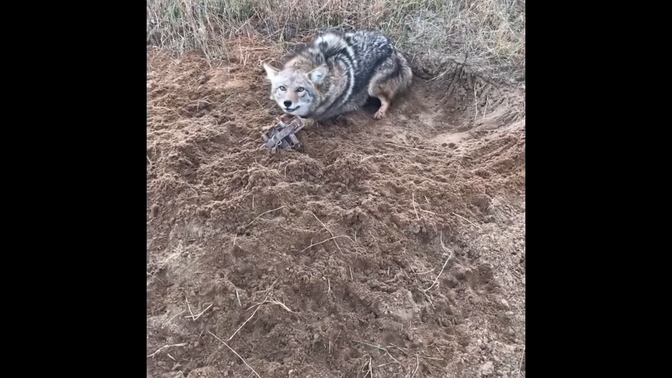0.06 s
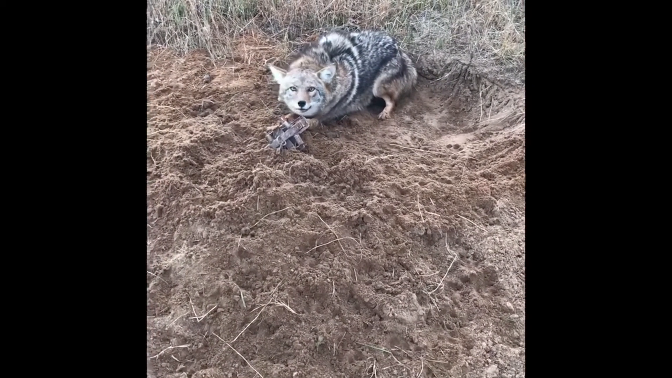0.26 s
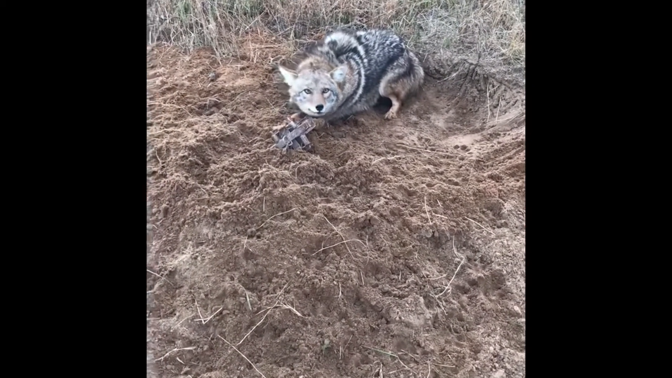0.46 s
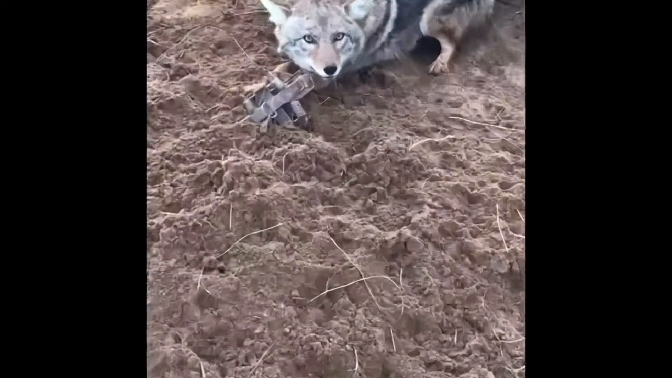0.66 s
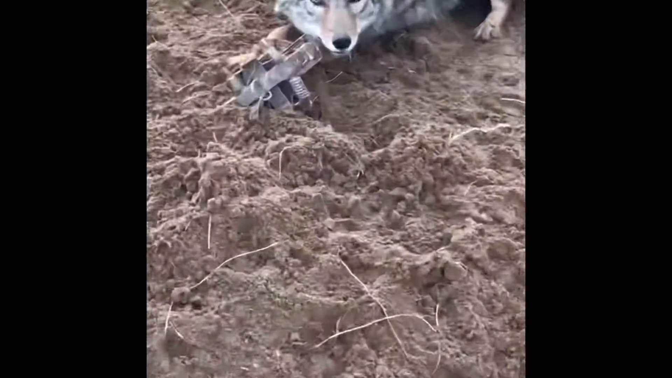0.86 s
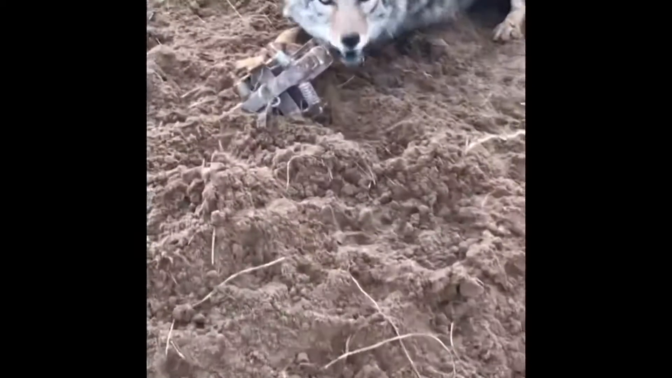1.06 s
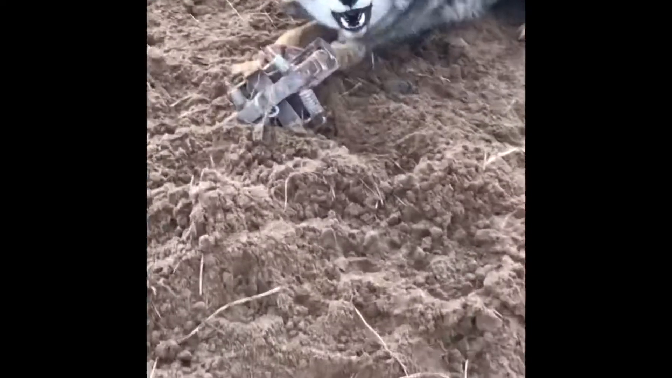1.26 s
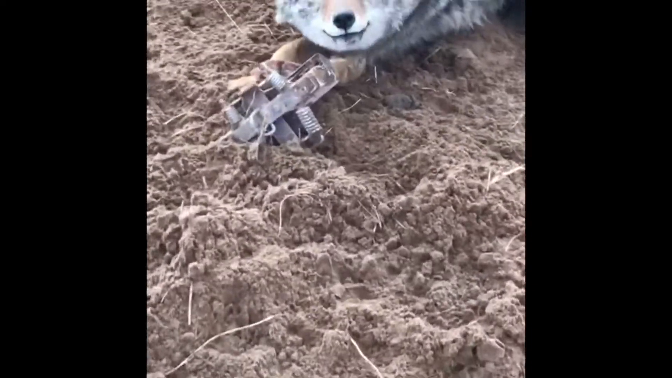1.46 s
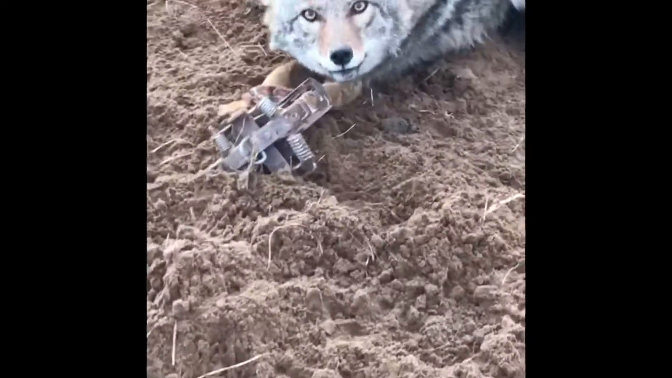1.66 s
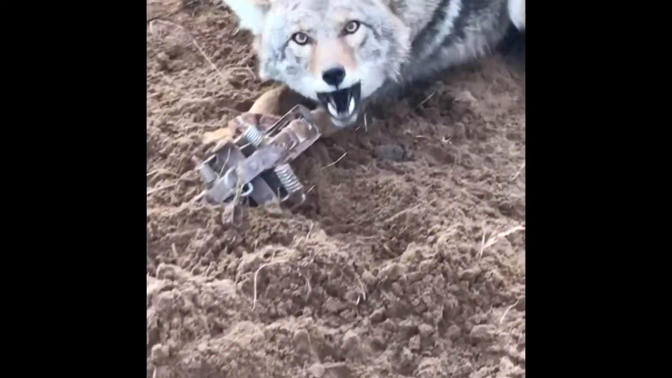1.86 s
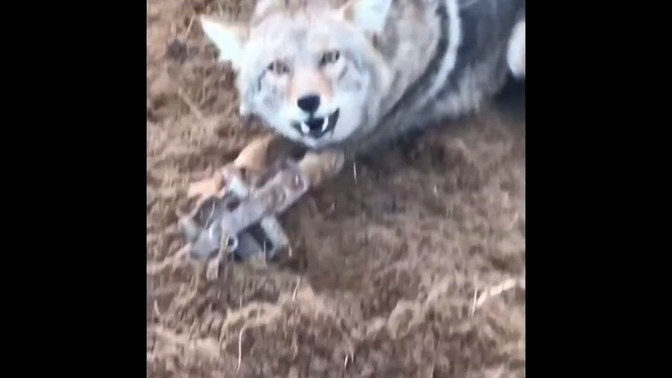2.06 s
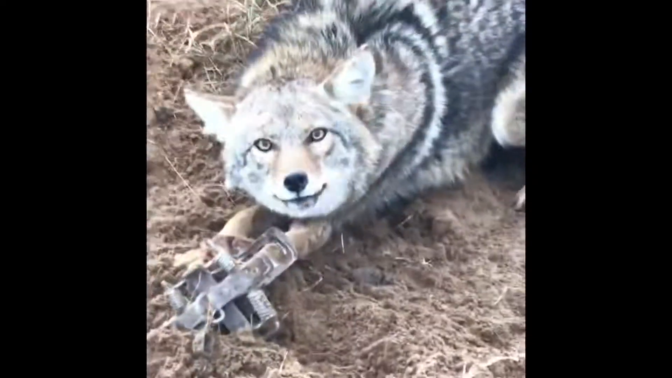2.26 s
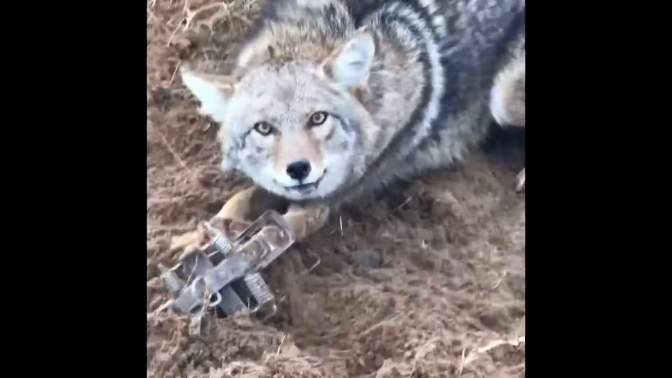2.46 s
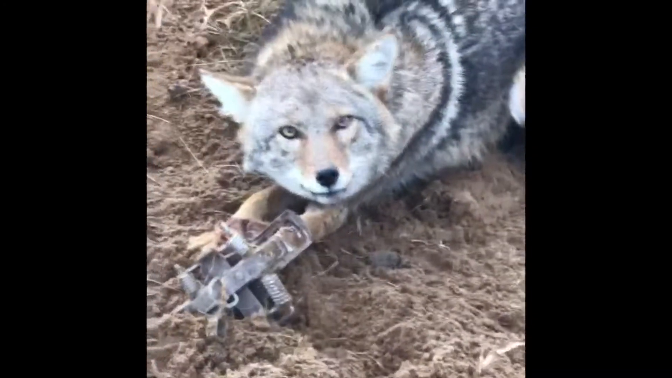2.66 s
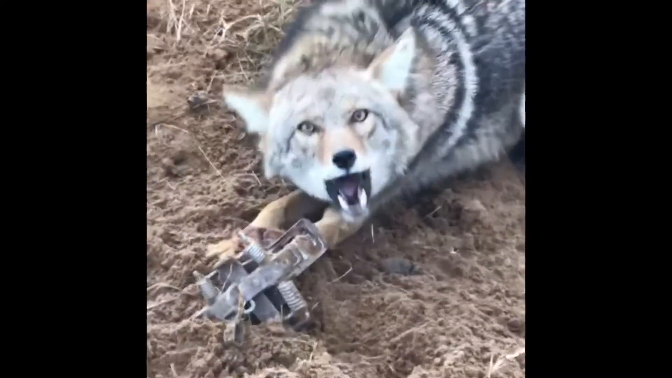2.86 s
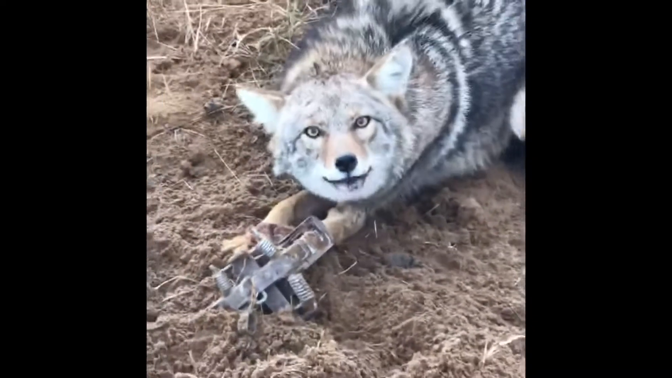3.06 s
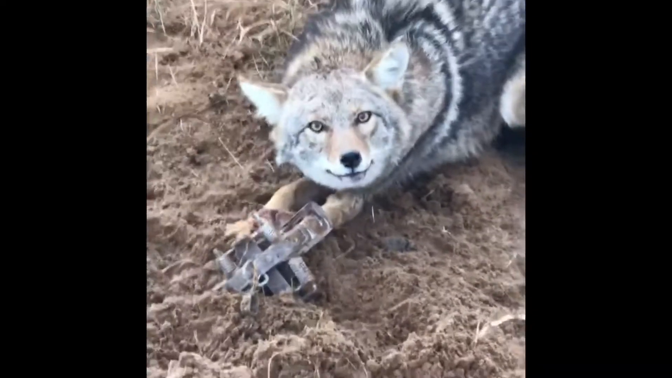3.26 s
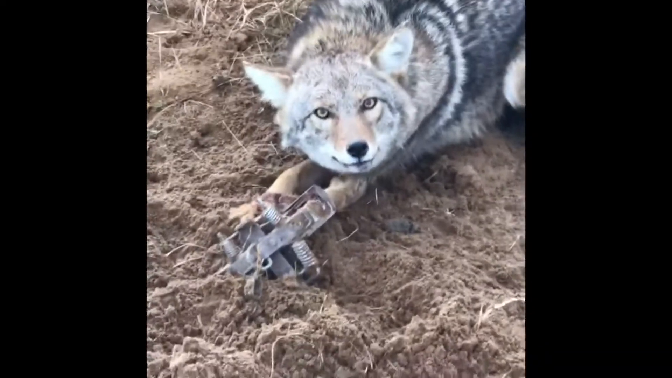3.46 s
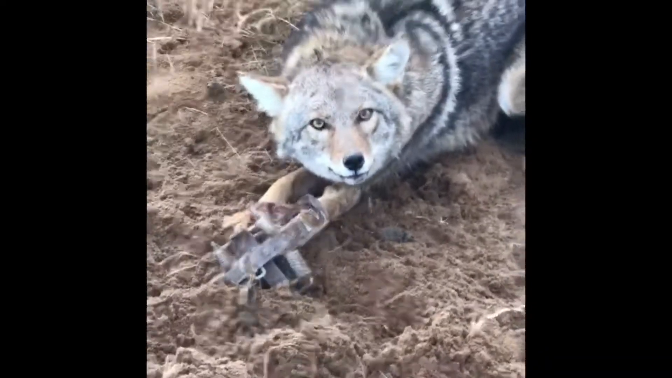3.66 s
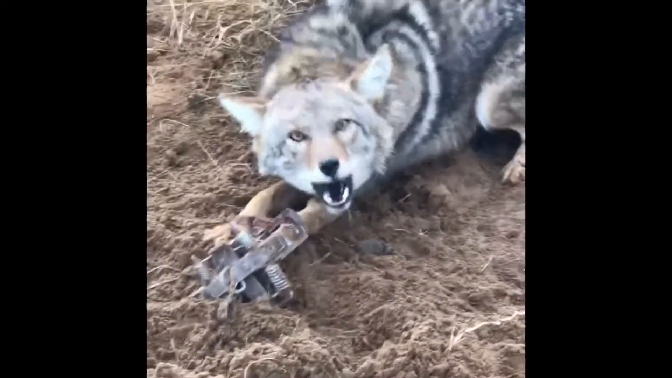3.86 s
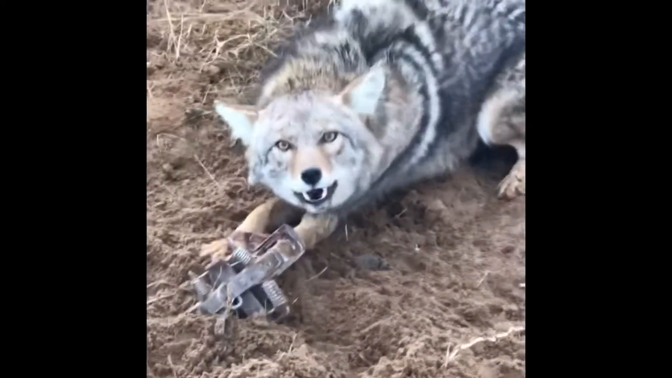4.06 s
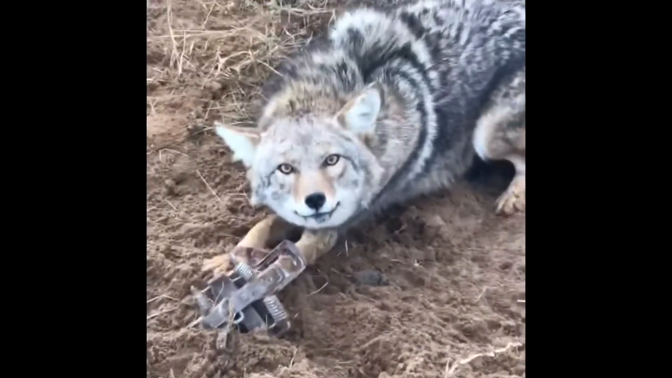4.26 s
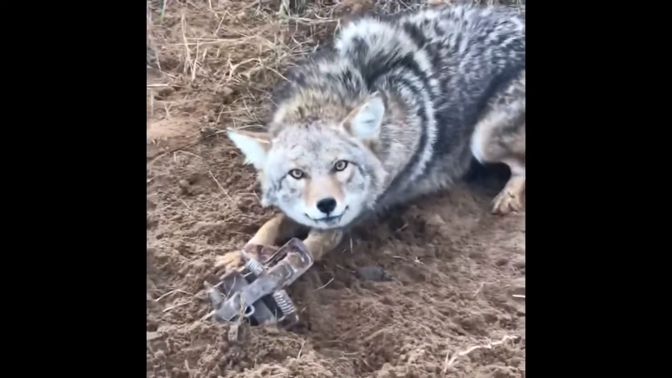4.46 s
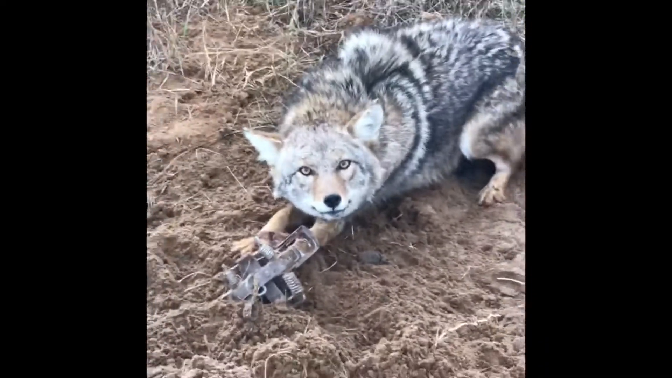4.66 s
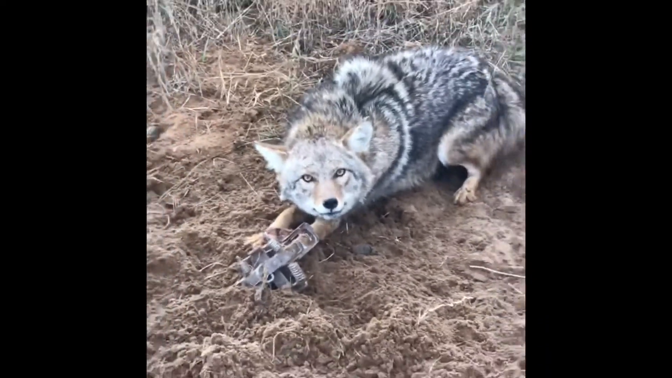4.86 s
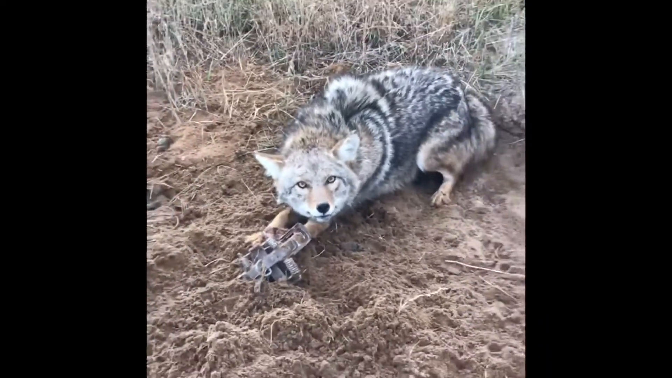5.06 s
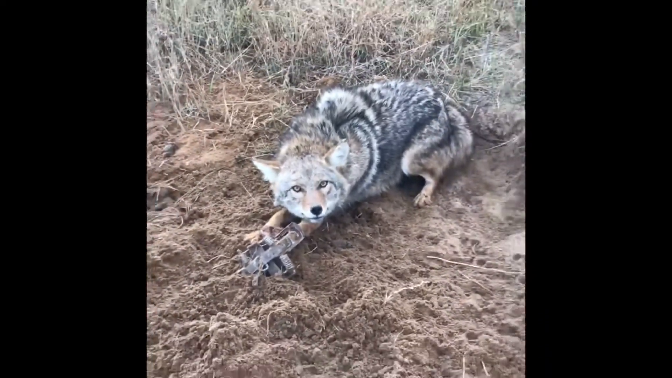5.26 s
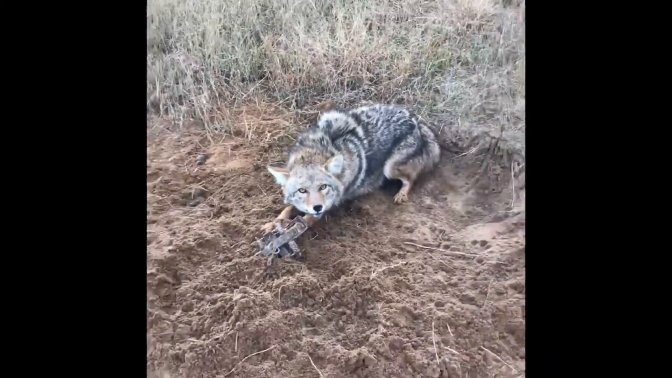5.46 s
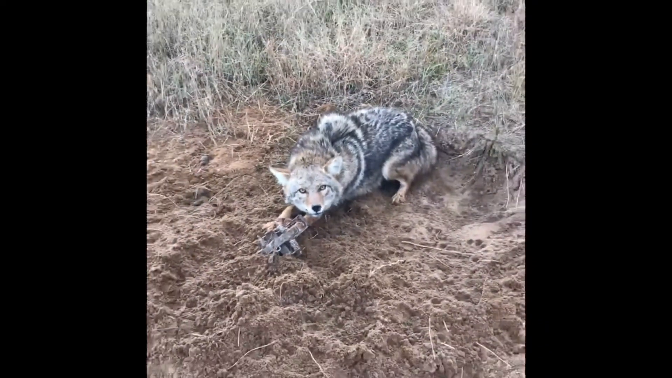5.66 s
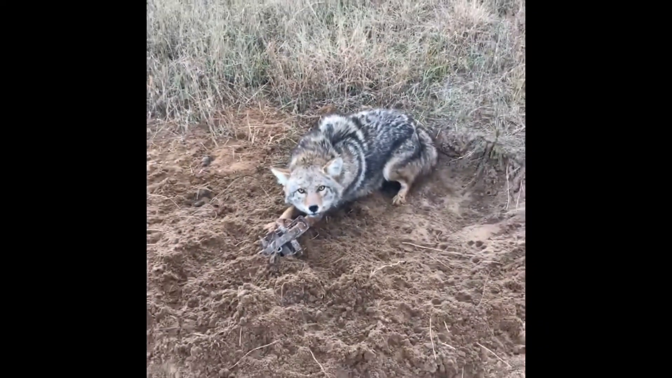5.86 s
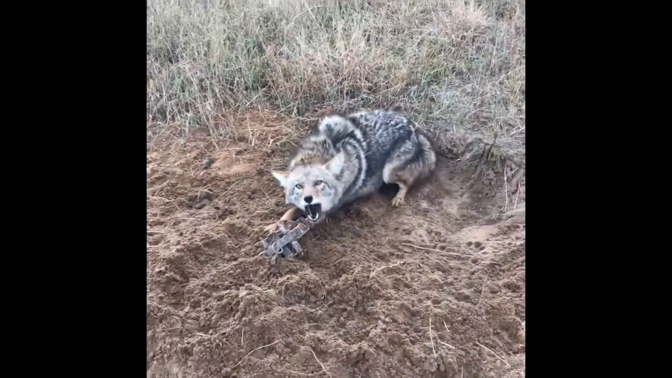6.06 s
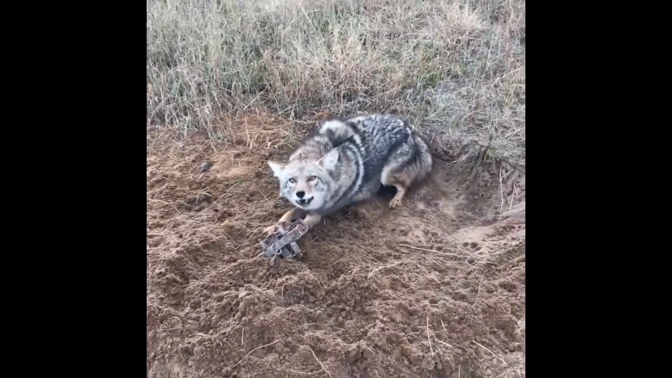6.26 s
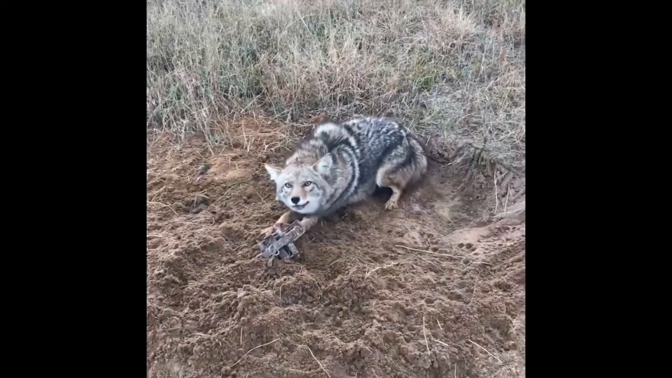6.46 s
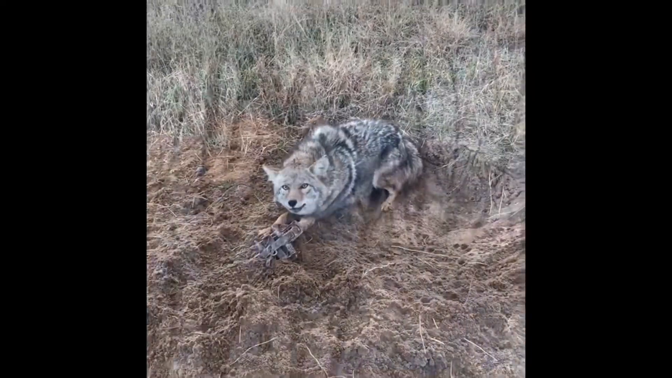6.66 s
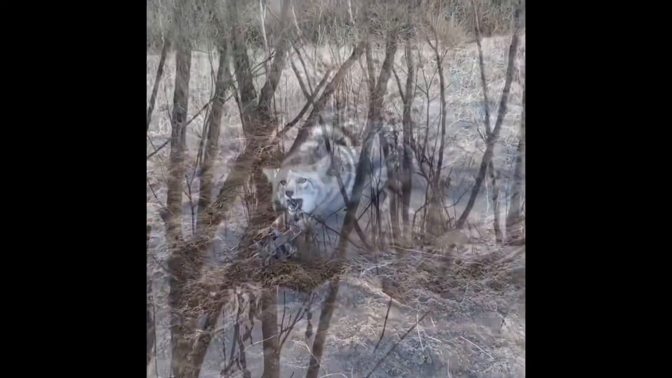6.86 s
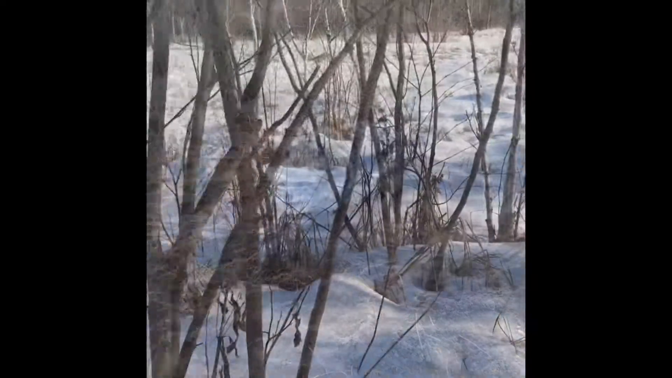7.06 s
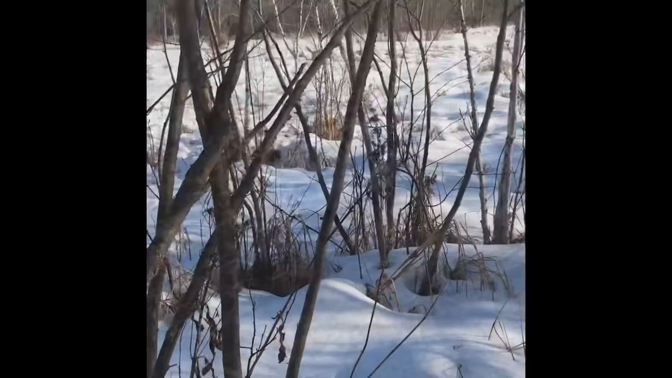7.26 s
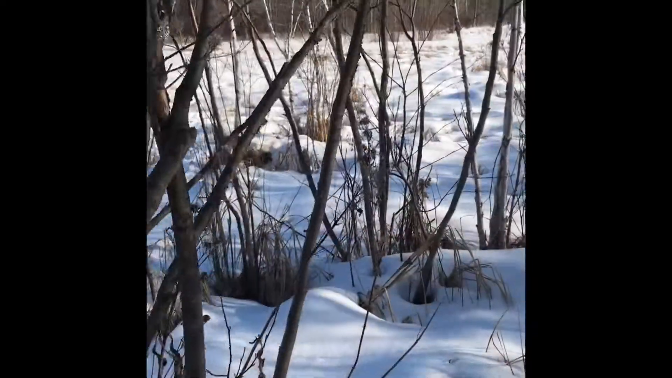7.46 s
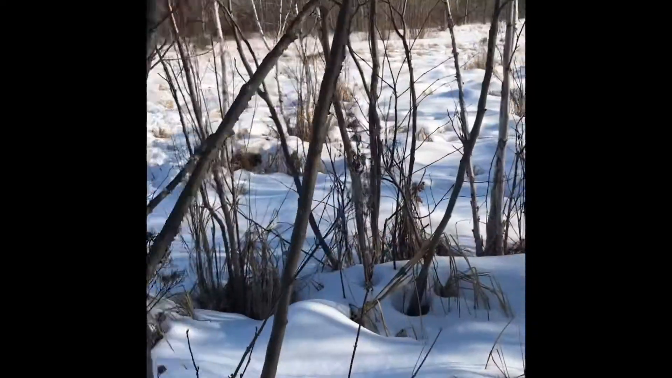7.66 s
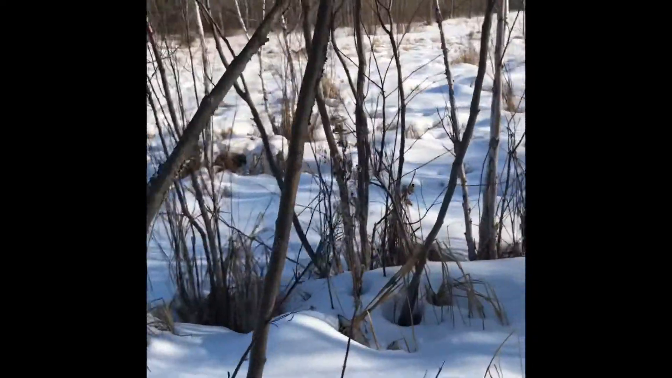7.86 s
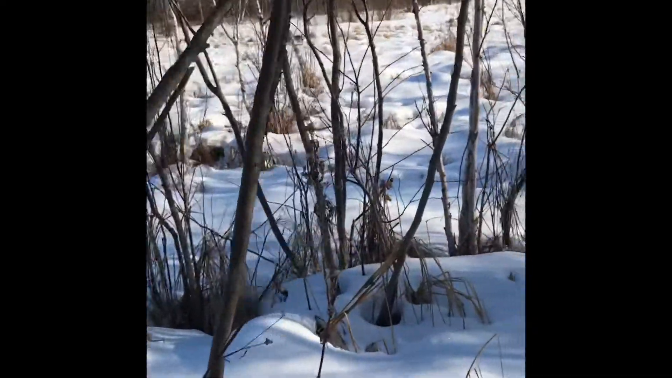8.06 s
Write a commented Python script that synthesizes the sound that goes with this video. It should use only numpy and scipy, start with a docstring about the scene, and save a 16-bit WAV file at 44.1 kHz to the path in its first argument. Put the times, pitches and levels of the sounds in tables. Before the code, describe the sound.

A faint steady hiss of a far road, strongest in the middle range, opens outdoors with soft dry grass rustle and a few tiny ticks. At about 1.05 seconds a nearby coyote gives a sharp, hoarse bark, roughly an eighth of a second long, its pitch arching quickly up and down with a rough, raspy edge. Low wind bumps hit the microphone around 1.25 to 1.5. Similar barks follow near 1.8, 2.7 and 3.8, then, after a longer gap, at 6.0 and 6.7. Very quiet, slow-pulsing growls swell in the gaps; slight ticks trail some barks and grass rustles again near 4.8 and 5.8. From 6.5 the background drops quickly, then keeps fading. Boots begin crunching crusty snow softly near 6.9, with a stronger crunch around 7.4, another from 7.6 and brittle twig-like snaps until the end near 8.1.

```python
"""Over the steady hiss of a far road, with rustling grass and a light wind bumping the microphone, a coyote
barks six times from about one second in, with low growls between; small ticks are scattered throughout.
Two parts of its larynx vibrate at once: a low arching voice and, early in each bark, a higher one that roughens it.
From 6.5 seconds the field fades, fast and then slowly; soon boots crunch through snow.
Pulses and puffs of air ring resonances to make the animal; shaped noise makes nearly all the rest."""
import sys
import numpy as np
from scipy import signal
from scipy.io import wavfile
from scipy.ndimage import uniform_filter1d, minimum_filter1d

SR = 44100
rng = np.random.default_rng(int(sys.argv[2]) if len(sys.argv) > 2 else 0)


def to_wav(s):
    """Save 16-bit WAV."""
    ch = np.atleast_2d(s).T  # columns
    pcm = np.round(np.clip(ch, -1, 1) * 32767)  # PCM
    wavfile.write(sys.argv[1], SR, pcm.astype(np.int16))


N = 357647  # length in samples


def gain_of(db):
    """Turns decibels into a factor."""
    return 10 ** (np.asarray(db) / 20)


def evened(x):
    """Scales a signal to an rms (average strength) of 1."""
    return x / np.sqrt(np.mean(x ** 2) + 1e-20)


def curve(rows, t):
    """Reads each column of a table at times t, with straight lines between rows."""
    seconds, *columns = np.transpose(rows)
    return [np.interp(t, seconds, column) for column in columns]


def add(mix, start, sound):
    """Mixes a sound in at start seconds."""
    part = mix[round(start * SR):][:len(sound)]
    part += sound[:len(part)]


def wobble(count, size):
    """Smooth chance of rms 1 that changes over about size samples."""
    once = uniform_filter1d(rng.standard_normal(count), size)
    return evened(uniform_filter1d(once, size))


def resonate(x, hz, width):
    """Shifts the frequency hz down to zero, smooths, and shifts back: a resonance of gain 1."""
    turn = np.exp(2j * np.pi * np.cumsum(hz * np.ones(len(x))) / SR)
    r = np.exp(-np.pi * abs(width) / SR)
    return 2 * (turn * signal.lfilter([1 - r], [1, -r], x / turn)).real


def ring(x, modes, factor):
    """Steep resonances side by side, with signs taking turns; one factor moves all their frequencies."""
    total = 0
    for k, (hz, width, db) in enumerate(modes):
        once = resonate(x, hz * factor, width)
        total = total + (-1) ** k * gain_of(db) * resonate(once, hz * factor, 2 * width)
    return total


def hiss(spectrum, patchy_db, size):
    """Noise of the given spectrum, of rms 1, whose short-time spectra carry drifting patches."""
    frames, bins_hz = 4 * N // size + 5, np.fft.rfftfreq(size, 1 / SR)
    a, b, patches = rng.standard_normal((frames, len(bins_hz), 3)).T
    patches = evened(uniform_filter1d(uniform_filter1d(patches, 12, 0), 14, 1))
    hz, db = np.transpose(spectrum)
    colour_db = np.interp(np.log(bins_hz + 1), np.log(hz + 1), db, left=-100, right=-100)[:, None]
    z = (a + 1j * b) * gain_of(colour_db + patchy_db * patches)
    return evened(signal.istft(z, nperseg=size, noverlap=3 * size // 4)[1][:N])


def coyote():
    """Growls and barks, with one quick reflection off the soil."""
    # Low voice, one row a bark. Each row: start in seconds, attack in seconds, effort after the attack in dB,
    # effort peak in seconds into the bark, peak effort in dB, first pitch in Hz, pitch top in seconds into
    # the bark, top pitch in Hz, last pitch in Hz, chest tone peak in seconds into the bark,
    # chest tone in dB, rasp in dB.
    low_rows = [(1.052, .022, -14.5, 0.096, -6.5, 344.8, 0.045, 449, 349.2, 0.047, -10, -27.5),
                (1.826, 0.021, -19, 0.094, -2.5, 289.8, .07, 470.2, 288.4, 0.059, -12, -26),
                (2.727, 0.024, -20, 0.09, -2, 292.6, 0.059, 458, 316, 0.057, -14, -27.5),
                (3.818, 0.027, -15, 0.089, -2, 291, 0.069, 433.8, 290.8, 0.054, -19.5, -30),
                (5.998, 0.018, -14.5, 0.091, -4, 294.7, .07, 469.4, 295.2, 0.044, -15, -26.5),
                (6.707, 0.024, -20.5, 0.093, -7.5, 288.8, 0.084, 437.2, 276.3, 0.06, -22.5, -33)]
    # High voice, one row a bark. Each row: start in seconds, length in seconds, first pitch in Hz,
    # last pitch in Hz, effort in dB, effort gained on the way in dB.
    high_rows = [(1.092, 0.073, 581, 681, -8.5, -6.5), (1.834, 0.087, 465, 688.4, -20.5, 2.5),
                 (2.736, 0.053, 468.4, 607.6, -18.5, -7), (3.831, 0.065, 491.8, 637, -20, -2),
                 (6.005, .088, 504.5, 682.3, -23, 9.5), (6.716, 0.088, 472, 672, -24, -3)]
    # Where each bark turns clear. Each row: from in seconds, to in seconds, roughness there (0-1),
    # roughness elsewhere (0-1).
    clear_rows = [(1.11, 1.145, .3, .5), (1.902, 1.932, .03, .55), (2.793, 2.83, .02, .55),
                  (3.878, 3.92, .02, .55), (6.09, 6.115, .3, .55), (6.79, 6.82, .12, .5)]
    # Low growls. Each row: start in seconds, end in seconds, first pulse rate in Hz, last pulse rate in Hz,
    # level at the start in dB, swell towards the bark in dB.
    growl_rows = [(1.442, 1.858, 52.74, 66.45, -50, 17.5), (2.08, 2.759, 53, 61.96, -50, 7.5),
                  (3.099, 3.852, 47.55, 50.07, -57.5, 14.5), (4.149, 6.029, 33.69, 38.49, -61, 15.5),
                  (6.25, 6.741, 45.94, 60.4, -53, 11)]
    out = np.zeros(N)
    for row in growl_rows:
        add(out, *growl(*row))
    for parts in zip(low_rows, high_rows, clear_rows):
        add(out, *bark(*parts))
    return out + 0.15 * np.roll(out, round(.0035 * SR))


def bark(low, high, clear):
    """Both voices and their puffs of air ring the throat; chest tone and rasp join in."""
    # Throat and mouth, ahead of the mouth factor. Each row: centre in Hz, width in Hz, level in dB.
    throat_modes = [(682, 286, -2.5), (1328, 265, 1), (1880, 266, -2.5), (2330, 200, -6.5),
                    (2670, 990, -20.5)]
    start, *low_settings, rasp_peak_db = low
    u = np.arange(SR // 4) / SR  # seconds into the bark
    t = start + u
    hz, effort_db, mouth, chest_db = low_voice(u, *low_settings)
    high_hz, high_db = high_voice(t, *high)

    clear_from, clear_to, smooth, coarse = clear
    rough = np.interp(t, [clear_from - .006, clear_from, clear_to, clear_to + 0.003],
                      [coarse, smooth, smooth, coarse])
    turns, pulses = folds(hz, rough, tilt=0.18, count=26)
    high_turns, high_pulses = folds(high_hz, rough * 0.52, tilt=1.5, count=8)
    # air rushes most at the start of each turn of the low voice
    puffs = evened((.3 + np.exp(-(turns % 1) / 0.34)) * rng.standard_normal(len(t)))

    sounding, high_sounding = gain_of(effort_db), gain_of(high_db)
    # the high voice also squeezes the air that drives the low one, which gives sidebands
    high_share = high_sounding / (sounding + high_sounding)
    coupling = 1 + 3.4 * high_share * np.cos(2 * np.pi * high_turns)
    breath = 3.0 * (rough + .1) * puffs
    drive = sounding * (pulses * coupling + breath) - 1.6 * high_sounding * high_pulses
    throat = swallow(ring(drive, throat_modes, mouth))

    chest = np.sqrt(2) * gain_of(chest_db) * np.cos(2 * np.pi * turns)
    chest *= gain_of(9.0 * rough * np.tanh(wobble(len(t), size=90)))

    rasp_sound = rasp(u, low_settings[0], rasp_peak_db, rough, mouth, puffs, pulses)
    voice = -gain_of(5.0) * throat - chest + rasp_sound
    return start, np.minimum(u / 0.0023, 1) * voice  # starts from silence


def low_voice(u, attack, early_db, peak_s, peak_db, first_hz, top_s, top_hz, last_hz, chest_s, chest_db):
    """Pitch arches, effort swells and dies, and the mouth opens, at u seconds into a bark; also the chest level."""
    fallen_s = .123  # the pitch has dropped by this time
    rising = np.clip(1 - u / top_s, 0, 1)
    falling = np.clip((u - top_s) / (fallen_s - top_s), 0, 1)
    hz = top_hz - (top_hz - first_hz) * rising ** 1.25 - (top_hz - last_hz) * falling ** 2.2

    # effort: curved attack, straight climb, curved release, then a weak tail that outlasts the release
    silent_db, release_s = -57, 0.041
    late = np.maximum(u - peak_s, 0)
    tail_db = -28.5 - 480.5 * np.maximum(late - release_s, 0)
    release_db = np.maximum(-29 * (late / release_s) ** 2.23, tail_db)
    effort_db = np.interp(u, [attack, peak_s], [early_db, peak_db]) + release_db
    effort_db = effort_db + (silent_db - early_db) * np.maximum(1 - u / attack, 0) ** 1.5

    # mouth as a factor on the throat frequencies: snaps open, then widens
    shut, opened, wide = 0.53, 0.85, 0.998
    mouth = opened + (shut - opened) * np.exp(-u / .013) + (wide - opened) * np.minimum(u / .12, 1)
    return hz, effort_db, mouth, chest_level(u, attack, chest_s, chest_db, effort_db)


def chest_level(u, attack, chest_s, chest_db, effort_db):
    """The chest tone climbs to its peak, then falls to a rest level that stays under the dying effort; in dB."""
    start_db, climb_db_per_s, fall_db_per_s = -50.5, 246.5, 701.5
    after_attack_db = chest_db - climb_db_per_s * (chest_s - attack)
    climb_db = np.interp(u, [0, attack, chest_s], [start_db, after_attack_db, chest_db])
    rest_db = np.minimum(-30.5, effort_db - 7.5)
    fall_db = np.maximum(chest_db - fall_db_per_s * (u - chest_s), rest_db)
    return np.where(u < chest_s, climb_db, fall_db)


def high_voice(t, start, length, first_hz, last_hz, db, gain_db):
    """The pitch climbs all the way; effort attacks, drifts steadily and lets go."""
    attack_s, release_s, edge_db = 0.018, .014, -24.5
    share = np.clip((t - start) / length, 0, 1)
    before = np.maximum(1 - (t - start) / attack_s, 0)
    after = np.maximum(1 - (start + length - t) / release_s, 0)
    hz = first_hz + (last_hz - first_hz) * share ** .7
    return hz, db + gain_db * share + edge_db * (before + after)


def rasp(u, attack, peak_db, rough, mouth, puffs, pulses):
    """Air puffs and voice pulses ring ragged bands at the teeth, in step with the low voice."""
    # Bands of the rasp. Each row: centre as a multiple of the brightest band, width in Hz, level in dB.
    bands = [(.52, 715, -12.5), (.645, 500, 2), (1.001, 600, 5), (1.34, 650, 0), (1.55, 700, -10),
             (1.8, 1500, -15), (2.15, 1975, -12.5)]
    # Path of the brightest band. Each row: seconds into the bark, frequency in Hz.
    bright_rows = [(0, 5800), (.02, 5950), (.048, 6200), (.066, 6700), (.1, 6450), (.125, 6300)]
    bright_hz = curve(bright_rows, u)[0]
    stop_s, dropped_s = 0.12, 0.12 + 0.021
    rasp_db = peak_db + np.interp(u, [0, attack + 0.011, 0.057, .07, stop_s, dropped_s],
                                  [-36.5, -3, -2.5, 0, 0, -24])
    fading_db = rasp_db - 419 * np.maximum(u - dropped_s, 0)
    flicker = gain_of(3.0 * np.tanh(wobble(len(u), size=150)))
    air = puffs * flicker + 3.0 * (.6 - rough) * pulses
    shut_db = 60 * np.maximum(.98 - mouth, 0)  # the lower bands bloom only once the mouth is open
    ragged = 0
    for k, band in enumerate(bands):
        # each band flares and sinks on its own as lips and tongue shake
        shake_db = 3.2 * wobble(len(u), size=350) - shut_db * (band[0] < .8)
        ragged = ragged + (-1) ** k * ring(air * gain_of(shake_db), [band], bright_hz)
    return gain_of(fading_db) * evened(swallow(ragged))


def swallow(x):
    """A side pocket of the throat swallows a band around 5400 Hz."""
    return signal.lfilter(*signal.iirnotch(5400, 4.0, SR), x)


def growl(start, end, first_hz, last_hz, level_db, swell_db):
    """Slow slack pulses behind closed jaws, quickening and swelling into the next bark."""
    # Closed-mouth resonances, ahead of a factor of 0.89 on their centres.
    # Each row: centre in Hz, width in Hz, level in dB.
    chest_modes = [(107.3, 107, -1.5), (181, 110, -3), (281.5, 76, -0.5), (462, 220, -13.5)]
    t = np.arange(start, end, 1 / SR)
    share = (t - start) / (end - start)
    hz = first_hz + (last_hz - first_hz) * share ** .6
    waver_db = 2.5 * wobble(len(t), size=2500)
    db = level_db + swell_db * share ** 2.63 + waver_db
    pulses = folds(hz, np.full(len(t), .2), tilt=.2, count=14)[1]
    edges = signal.windows.tukey(len(t), 2 * .03 / (end - start))  # fades of 0.03 s
    return start, gain_of(db) * evened(ring(pulses, chest_modes, 0.89)) * edges


def folds(hz, rough, tilt, count):
    """A train of closing pulses, each smeared a little; roughness shakes their timing and strength."""
    shaken_hz = hz * (1 + .14 * rough * wobble(len(hz), size=60))
    turns = np.cumsum(shaken_hz) / SR
    pulses = sum(np.cos(2 * np.pi * k * turns - .12 * k * k) * k ** -tilt for k in range(1, count))
    return turns, evened(pulses) * gain_of(11.0 * rough * np.tanh(wobble(len(hz), size=80)))


def snow():
    """Crust breaks in clumps of tiny fractures as weight comes on."""
    # Weight comes onto the snow. Each row: start in seconds, rise in seconds, peak in dB, fall in dB per second.
    step_rows = [(6.86, 0.015, -59, 43), (7.28, 0.027, -52.5, 197), (7.394, 0.05, -32, 106),
                 (7.62, .11, -45, 58), (7.814, 0.0055, -49.5, 149), (8.03, 0.0059, -46, 452)]
    # Colour of the crunch. Each row: frequency in Hz, relative level in dB per Hz.
    snow_spectrum = [(80, -14.5), (185, 5), (310, 2), (500, -5.5), (1200, -11.5), (2400, -18.5),
                     (3700, -16), (5000, -27), (6400, -21.5), (10500, -32.5), (13000, -31), (15700, -37)]
    t = np.arange(N) / SR
    # about 350 cracks a second, each of its own strength, dying in about 2 ms
    cracks = gain_of(3.5 * np.minimum(rng.exponential(1, N), 4)) * (rng.random(N) < 350 / SR)
    dying = signal.lfilter([1], [1, -np.exp(-1 / (.002 * SR))], cracks)
    clumps = evened(.4 + dying / 4.0)
    weight = gain_of(-60 - 100 * np.maximum(step_rows[0][0] - t, 0))  # soft settling under the steps
    for start, rise, db, fall_db in step_rows:
        late = t - start - rise
        shape_db = np.where(late < 0, 12 * late / rise, -fall_db * late)
        weight = weight + (t > start) * gain_of(db + shape_db)
    crunch = weight * clumps * hiss(snow_spectrum, patchy_db=0.5, size=256)
    return signal.sosfilt(signal.butter(4, 130, "high", fs=SR, output="sos"), crunch)


def ticks():
    """Short snaps of dying noise that ring in one band, some with a bright edge."""
    # Some trail the barks, others are like grit and dry grass, later twigs and crust.
    # Each row: start in seconds, strength in dB, frequency in Hz, treble in dB relative to the strength.
    tick_rows = [(0.407, -46, 3630, -5), (0.6124, -53, 3220, 4), (0.643, -53, 2850, -23),
                 (0.693, -55, 4500, -13), (1.977, -42, 3680, -29.5), (1.988, -44, 3900, -28),
                 (2.0777, -41, 3850, -27), (2.127, -50, 3900, -30), (2.8903, -42, 3770, -24),
                 (2.9074, -42, 3290, -28), (2.9317, -45.5, 3280, -28), (3.965, -45, 3700, -28),
                 (3.978, -43, 3570, -24), (5.1297, -43, 2830, -28), (6.145, -34, 3500, -28),
                 (6.895, -57, 5470, -18), (6.9076, -46, 6440, -20), (7.07, -41.5, 3340, -32),
                 (7.1127, -56, 2930, -21), (7.3, -48, 3150, -20), (7.3986, -41, 3580, -15),
                 (7.4383, -23, 4140, -17), (7.5672, -57, 3830, -20), (7.6898, -32, 3340, -7),
                 (7.8197, -27, 3550, -9), (7.9464, -42, 3820, -23), (8.0107, -51.5, 3880, -16.5),
                 (8.0366, -52, 3620, -15)]
    out, t = np.zeros(N), np.arange(SR // 30) / SR
    for start, db, hz, treble_db in tick_rows:
        burst = rng.standard_normal(len(t)) * gain_of(db - 60 * t / 0.013)
        edge = 0.5 * gain_of(treble_db) * np.diff(burst, prepend=0)
        body = 1.62 * resonate(resonate(burst, hz, 1160), hz, 1700)
        add(out, start, edge + body)
    return out


def gusts():
    """Each gust thumps the microphone: a short low swing with a flutter of turbulence on it."""
    # Each row: start in seconds, strength in dB, frequency in Hz, time to die by 60 dB in seconds.
    gust_rows = [(1.239, -28.5, 75, .08), (1.266, -21.5, 111, 0.023), (1.276, -27, 137, 0.096),
                 (1.291, -30, 64.2, 0.17), (1.31, -25, 128, 0.037), (1.359, -22.5, 136, 0.082),
                 (1.381, -18.5, 83, 0.11), (1.392, -11.5, 186, 0.017), (1.409, -22.5, 105, 0.063),
                 (1.52, -34, 109, 0.11), (1.629, -37, 71, 0.18), (2.505, -33, 70, 0.23)]
    out, t = np.zeros(N), np.arange(SR // 5) / SR
    for start, db, hz, t60 in gust_rows:
        flutter = evened(resonate(resonate(rng.standard_normal(len(t)), 240, 330), 240, 330))
        shape = gain_of(db - 60 * t / t60) * (1 - np.exp(-t / 0.0008))
        add(out, start, shape * (0.24 * flutter - 2.2 * np.sin(2 * np.pi * hz * t)))
    return out


def wind(t):
    """Wind rumbles in lumps on the microphone: low noise whose level wavers."""
    # Each row: frequency in Hz, relative level in dB per Hz.
    wind_spectrum = [(12, -44), (20, -21), (71, 4), (107, -2), (133, -9), (166, -5.5), (302, -26.5),
                     (330, -28.5), (420, -26), (550, -44.5), (920, -120)]
    # Each row: time in seconds, level in dB ahead of the lumps and the field's fade.
    wind_levels = [(0, -42), (.4, -46.5), (1, -46), (1.25, -36.5), (1.8, -34), (2, -41.5), (3, -44.5),
                   (3.6, -44), (6.75, -41.5), (7, -43.5), (8.11, -46)]
    lumps_db = 1.5 * wobble(N, size=900)
    return gain_of(curve(wind_levels, t)[0] + lumps_db) * hiss(wind_spectrum, patchy_db=1.2, size=2048)


def grass(t):
    """Grass rustles: bright noise that swells and sinks in smooth humps."""
    # Each row: middle in seconds, half length in seconds, level in dB ahead of the field's fade.
    rustle_rows = [(.3, 0.8, -70), (2.1, .15, -75), (4.8, 0.3, -77), (5.757, 0.61, -74)]
    # Each row: frequency in Hz, relative level in dB per Hz.
    grass_spectrum = [(1500, -33.5), (3000, -1), (4300, -4), (5500, -9.5), (8000, -13), (12000, -24.5)]
    swell = sum(gain_of(db) * np.exp(-((t - middle) / half) ** 2) for middle, half, db in rustle_rows)
    return swell * hiss(grass_spectrum, patchy_db=2.5, size=256)


def road():
    """A far road: steady noise, strongest near 1 kHz."""
    # Each row: frequency in Hz, relative level in dB per Hz.
    road_spectrum = [(150, -51.5), (250, -4.5), (330, -16.5), (443, -11), (508, -10.5), (947, 1.5),
                     (1170, 1), (1680, -5.5), (1890, -13), (2450, -19.5), (2870, -27.5), (7690, -46.5),
                     (12500, -41.5), (15600, -48.5)]
    return gain_of(-46) * hiss(road_spectrum, patchy_db=0.82, size=1024)


def field():
    """Road, grass and wind together, fading fast and then slowly."""
    fade_from_s, fade_s = 6.52, 0.42
    t = np.arange(N) / SR
    fast_db = -7 * np.clip((t - fade_from_s) / fade_s, 0, 1)
    slow_db = -10 * np.maximum(t - fade_from_s - fade_s, 0)
    return gain_of(fast_db + slow_db) * (road() + grass(t) + wind(t))


def scene():
    """Everything at one microphone."""
    return (coyote() + field() + gusts() + ticks() + snow())[None]


def record(dry):
    """Deep bass is cut; gain control dips at loud moments, holds and lets go; peaks clip softly; treble is cut."""
    power_db = 10 * np.log10(abs(uniform_filter1d(dry[0] ** 2, 600)) + 1e-12)
    dip_db = -np.clip(0.23 * (power_db + 21.0), 0, 6.0)  # dips above -21 dB, by 6 dB at most
    hold = round(.17 * SR)
    held_db = minimum_filter1d(np.r_[np.zeros(hold // 2), dip_db][:N], hold)  # looks back over the hold time
    thinned = signal.sosfilt(signal.butter(2, 30, "high", fs=SR, output="sos"), dry)
    ducked = thinned * gain_of(uniform_filter1d(held_db, 600))
    limited = ducked / (1 + abs(ducked) ** 6) ** (1 / 6)
    band_limit = signal.firwin(511, 15800, window=("kaiser", 9), fs=SR)  # edge in Hz
    return signal.oaconvolve(limited, band_limit[None], "same")


dry = scene()
out = record(dry)
to_wav(out)
```